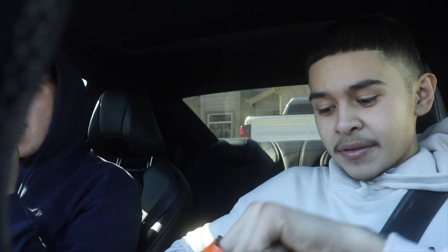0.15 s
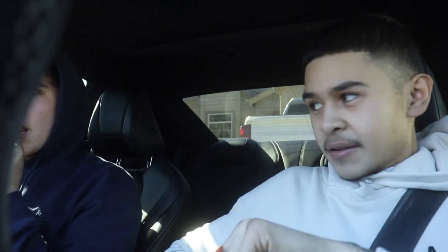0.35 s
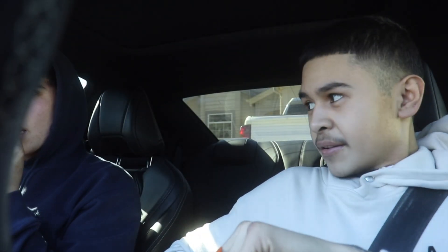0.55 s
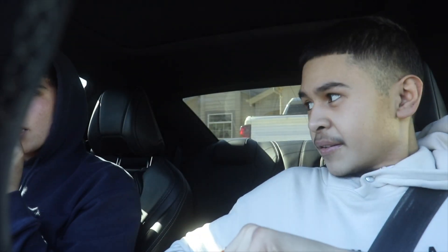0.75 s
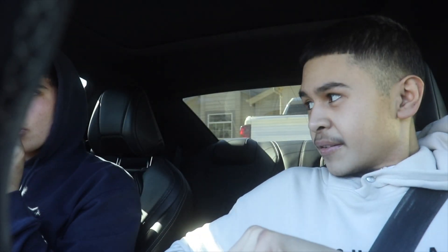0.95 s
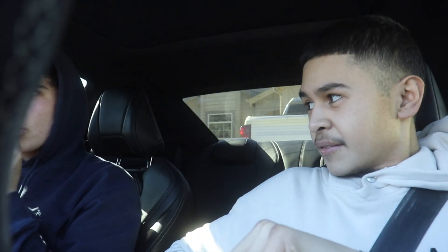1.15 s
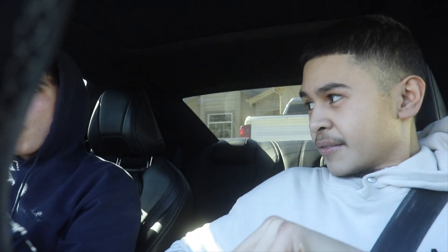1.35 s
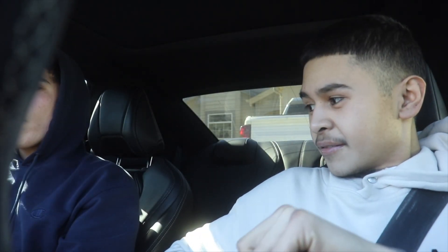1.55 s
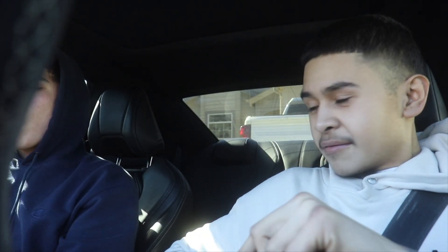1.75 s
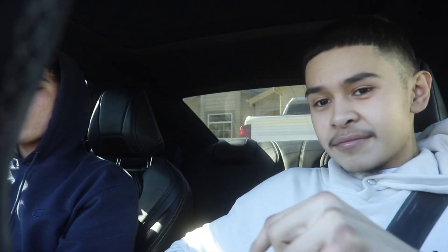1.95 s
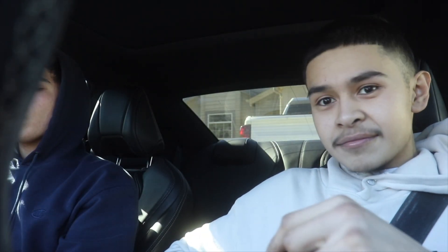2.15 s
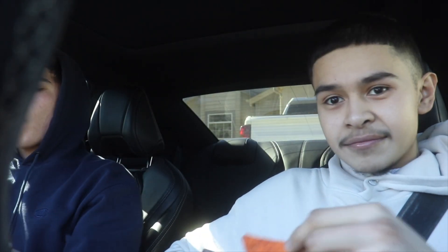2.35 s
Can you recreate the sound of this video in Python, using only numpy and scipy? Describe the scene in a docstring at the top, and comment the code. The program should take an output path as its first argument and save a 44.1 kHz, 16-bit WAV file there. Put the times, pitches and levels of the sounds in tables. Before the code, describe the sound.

A snack bag crinkles in short, irregular bursts as a hand digs inside. Sharp foil snaps mix with soft bumps on the bag, and chips click twice in small clusters, close by in a quiet parked car.

```python
"""Snack bag in a parked car

Hands dig in a foil bag: creases snap in short bursts over a fine rustle, film slides on film,
chips click and ring as they are pulled out, and the hand bumps the bag softly.
The small padded cabin answers briefly over a low rumble; the loudest snaps overload the microphone."""
import sys
import numpy as np
from scipy import signal
from scipy.fft import rfft, irfft, next_fast_len
from scipy.io import wavfile
from scipy.ndimage import uniform_filter1d, map_coordinates

SR = 44100
rng = np.random.default_rng(int(sys.argv[2]) if len(sys.argv) > 2 else 0)


def dump_mix(stems):
    """Bounce the given channels to the path in sys.argv[1] as a 16-bit WAV at rate SR."""
    frames = np.atleast_2d(stems).T  # one column per channel
    limited = np.clip(frames, -1, 1)  # hard clip at full scale
    pcm = np.round(limited * 32767).astype(np.int16)
    wavfile.write(sys.argv[1], SR, pcm)


N = 105840
SIZE = 4096  # samples per short event
T, HZ = np.arange(SIZE) / SR, np.fft.rfftfreq(SIZE, 1 / SR)
FLUTTER_T60_S = 0.02  # film shaking after a snap


def amp(db):
    """dB to gain."""
    return 10 ** (np.asarray(db) / 20)


def unit(x):
    """Scale to rms 1."""
    return x / np.sqrt(np.mean(x ** 2) + 1e-20)


def norm(x):
    """Scale to energy 1."""
    return x / np.sqrt(np.sum(x ** 2) + 1e-20)


def add(out, start_s, x):
    """Mix x into out at start_s."""
    part = out[max(round(start_s * SR), 0):][:len(x)]
    part += x[:len(part)]


def shape(points, hz=HZ):
    """Gain through (frequency [Hz], level [dB]) points, log axis."""
    point_hz, db = np.transpose(points)
    return amp(np.interp(np.log(hz + 1), np.log(point_hz + 1), db))


def hump(hz, width_oct):
    """Resonance, bell-shaped on a log axis."""
    return np.exp(-.5 * (np.log2((HZ + 1) / hz) / width_oct) ** 2)


def filtered(x, response):
    """Apply a frequency response to x."""
    size = next_fast_len(N + SIZE)
    return irfft(rfft(x, size) * response(np.fft.rfftfreq(size, 1 / SR)), size)[:N]


def coloured(x, points):
    """x shaped by a spectrum, rms 1."""
    return unit(filtered(x, lambda hz: shape(points, hz)))


def even(x):
    """Level a burst's broad colour, keep its timing and fine grain; energy 1."""
    spectrum = rfft(x)
    smooth_power = np.abs(uniform_filter1d(np.abs(spectrum) ** 2, size=41))
    return norm(irfft(spectrum / np.sqrt(smooth_power + 1e-20)))


def click(gain):
    """Minimum-phase pulse with this spectrum, energy 1."""
    cepstrum = irfft(np.log(np.maximum(unit(gain), 1e-4)))
    cepstrum[1:SIZE // 2] *= 2
    cepstrum[SIZE // 2 + 1:] = 0
    return norm(irfft(np.exp(rfft(cepstrum))))


def fade(t60_s):
    """Exponential decay."""
    return np.exp(-np.log(1000) * T / t60_s)


def tone(hz, t60_s):
    """Short, slightly rough ring, energy 1."""
    jitter_rad = 0.074 * np.cumsum(rng.standard_normal(SIZE))
    return norm(np.sin(2 * np.pi * hz * T + jitter_rad) * fade(t60_s))


def cabin():
    """Low rumble and faint hiss in the closed car."""
    # still cabin (frequency [Hz], level [dB])
    spectrum = [(20, -11.5), (45, -1), (90, -4.5), (170, -1.5), (280, -11), (550, -19), (1500, -23),
                (5000, -28), (10000, -35.5), (16000, -36)]
    return amp(-47) * coloured(rng.standard_normal(N), spectrum)


def pressure(start_s, end_s, edge_s):
    """A stroke builds up, holds and lets go."""
    t = np.arange(N) / SR
    outside_s = np.maximum(start_s - t, 0) + np.maximum(t - end_s, 0)
    return np.exp(-outside_s / edge_s)


def crackle(grains_per_s=830, spread_db=3):
    """Tiny creases of random size, each with a short flutter, on a smooth hiss."""
    sizes = amp(spread_db * np.minimum(rng.exponential(size=N), 3)) * rng.choice([-1, 1], N)
    grains = sizes * (rng.random(N) < grains_per_s / SR)
    flutter_power = np.abs(signal.fftconvolve(grains ** 2, fade(FLUTTER_T60_S) ** 2)[:N])
    flutter = np.sqrt(flutter_power) * rng.standard_normal(N)
    return unit(grains) + unit(flutter) + 0.8 * rng.standard_normal(N)


def patchy(x, limit_db=8):
    """Resonances come and go as the bag changes shape."""
    frames = signal.stft(x, nperseg=512)[2]
    field = uniform_filter1d(rng.standard_normal(frames.shape), size=5, axis=0)
    field = uniform_filter1d(field, size=7, axis=1)
    gain = amp(limit_db * np.tanh(unit(field) / 2))
    return unit(signal.istft(frames * gain, nperseg=512)[1][:N])


def rustle(uneven_db=1.5, uneven_per_s=55):
    """Countless tiny creases crackle while the hand rubs the film unevenly."""
    # hand strokes (start [s], end [s], crinkle [dB], rub [dB])
    strokes = [(0, 0.141, -49, -45), (0.212, 0.312, -35, -43.5), (0.38, 0.453, -37.5, -44.5),
               (0.532, 0.555, -43, -40.5), (0.59, 0.659, -43.5, -47.5), (0.839, 0.975, -37.5, -43),
               (1.035, 1.245, -33.5, -41), (1.324, 1.443, -36.5, -42.5), (1.444, 1.475, -30, -35),
               (1.491, 1.496, -25, -31), (1.552, 1.653, -32, -39), (1.717, 1.843, -35, -45.5),
               (1.872, 2.008, -38, -44), (2.071, 2.167, -37.5, -37.5), (2.369, 2.404, -46.5, -45)]
    # spectra of creases and rubbing (frequency [Hz], level [dB])
    crinkle_spectrum = [(410, -72), (700, -11), (958, -7), (1350, -2), (1680, -5.5), (5470, -7.5),
                        (5920, -14), (12200, -23), (16000, -34)]
    rub_spectrum = [(60, -4.5), (150, -6.5), (300, 6.5), (480, 0), (700, -4), (1500, -36)]
    start_s, end_s, crinkle_db, rub_db = np.transpose(strokes)[..., None]
    pressing = pressure(start_s, end_s, edge_s=0.024)
    wander = map_coordinates(rng.standard_normal(SIZE), [np.arange(N) / SR * uneven_per_s])
    crinkle_gain = np.max(amp(crinkle_db - 1.5) * pressing, axis=0)
    rub_gain = np.max(amp(rub_db - 2) * pressing, axis=0)
    crinkle = patchy(coloured(crackle(), crinkle_spectrum))
    rub = coloured(rng.standard_normal(N), rub_spectrum)
    return amp(uneven_db * wander) * (crinkle_gain * crinkle + rub_gain * rub)


def bumps():
    """Dull pushes on the air-filled bag, which rings briefly."""
    # hand on bag (time [s], level [dB], pitch [Hz])
    pushes = [(0.14, -22, 229), (0.398, -23, 190), (.539, -22.5, 172), (0.683, -26.5, 239),
              (.811, -23.5, 512), (1.145, -24, 474), (1.204, -28, 316), (1.256, -24, 315),
              (1.492, -27, 286), (1.622, -22.5, 332), (2.065, -18, 227), (2.1, -16, 214),
              (2.101, -20.5, 460)]
    out = np.zeros(N)
    for time_s, db, hz in pushes:
        push = click(hump(hz, width_oct=0.53) + 0.0011)
        boom = norm(signal.fftconvolve(push, tone(hz, t60_s=0.059))[:SIZE])
        add(out, time_s, amp(db + 17) * norm(push + 0.53 * boom))
    return out


def slides():
    """Film slipping over film crackles in one resonance."""
    # runs of tiny cracks (start [s], end [s], level [dB], centre [Hz])
    runs = [(0.208, 0.246, -45, 11000), (0.3, 0.4, -39, 4700), (0.858, 0.917, -46, 5300),
            (1.03, 1.054, -30.5, 7550), (1.923, 2.007, -44, 5630), (1.99, 2.012, -30, 9200),
            (2.002, 2.016, -34, 13100), (2.068, 2.183, -43, 2720)]
    out = np.zeros(N)
    for start_s, end_s, db, hz in runs:
        resonance = click(hump(hz, width_oct=0.22) + 0.055)
        crunch = signal.fftconvolve(crackle(), resonance)[:N]
        out += amp(db) * pressure(start_s, end_s, edge_s=0.0073) * patchy(crunch)
    return out


def scatter(t60_s, rise_s):
    """Dying cloud of small echoes, energy 1."""
    onset = 1 - np.exp(-(T / rise_s) ** 2)
    return norm(rng.standard_normal(SIZE) * fade(t60_s) * onset)


def shaken(pulse, give_s, db):
    """A pulse broken into quick steps and spread by the film, then film flutter and cabin echo."""
    steps = rng.standard_normal(SIZE) * fade(give_s) * T
    delay_1khz_s = 0.000637  # higher bending waves travel faster
    spread = irfft(rfft(pulse) * np.exp(-4j * np.pi * delay_1khz_s * np.sqrt(1000 * HZ)))
    crumple_db = -0.25 * db  # strong snaps flip cleanly, weak ones leave more shaking
    flutter = amp(crumple_db - 8) * scatter(FLUTTER_T60_S, rise_s=0.001)
    echo = amp(crumple_db / 2 - 11) * scatter(t60_s=0.06, rise_s=0.0019)
    burst = even(irfft(rfft(steps) * (1 + rfft(flutter + echo))))
    return norm(signal.fftconvolve(spread, burst[:SIZE // 2])[:SIZE])


def snaps(lag_s=0.0007):
    """A crease flips: a pulse at its facet's pitch, with a sharp edge and a puff of the bag's air."""
    # flips (time [s], level [dB], pitch [Hz], hollow body [dB], sharp edge [dB], give-way time [s])
    creases = [(0.2188, -8.5, 4530, -25, -16.5, 0.01), (0.2358, -9.5, 2620, -23.5, -12, 0.006),
               (0.2467, -12, 5640, -30, -13, 0.0022), (0.2642, 3.5, 4860, -28.5, -25, 0.0026),
               (0.282, -14, 2350, -22, -17, 0.0031), (0.41, -13, 4470, -21.5, -19, .004),
               (0.4281, -16, 3430, -32, -39, 0.0016), (0.4403, -5.5, 3600, -44, -10.5, 0.0023),
               (0.4517, -10, 1320, -32, -50, 0.0021), (0.4701, -11, 3640, -21.5, -21, 0.0022),
               (0.4731, -22, 3460, -36, -4, 0.0023), (0.4962, 3, 4860, -50, -20, 0.0011),
               (0.5363, -13.5, 1930, -14, -28, 0.0093), (0.644, -20, 3300, -15.5, -39, 0.0056),
               (0.683, -11.5, 4900, -25.5, -12.5, 0.0021), (0.8076, -18, 1470, -6.5, -69, 0.00068),
               (1.0615, -10.5, 1290, -19, -17, 0.0052), (1.0788, -7, 4350, -20.5, -16, 0.0031),
               (1.0929, -6.5, 3050, -24.5, -12, 0.0014), (1.1052, -14, 1380, -16, -25, .003),
               (1.1144, -12.5, 3700, -23, -39, 0.0028), (1.141, -9.5, 1440, -31, -18, 0.013),
               (1.3813, -13.5, 2100, -17.5, -20, .002), (1.4015, 0.5, 4500, -22.5, -17.5, 0.0036),
               (1.4026, -7, 1320, -22.5, -26, 0.0023), (1.463, -15, 1850, -17.5, -39, 0.0069),
               (1.5001, -8.5, 1350, -41, -24, 0.01), (1.5998, -8.5, 2240, -18.5, -28, 0.0012),
               (1.6673, -20, 5950, -36, -3.5, 0.0043), (1.7396, -5, 3000, -24.5, -26, 0.0045),
               (1.8111, -9, 4200, -20, -22, 0.0024), (1.815, -1, 3200, -31, -19, 0.0029),
               (1.897, -19.5, 2160, -14, -14, 0.0096), (2.099, -12.5, 2970, -27, -32, 0.0025)]
    # spectra of film, air in the bag and sharp edge (frequency [Hz], level [dB])
    film_spectrum = [(200, -25), (850, -21), (1100, 2), (1400, 5), (1850, -0.5), (2300, 11.5), (2800, 5.5),
                     (3400, 6.5), (5200, 8), (6500, 4.5), (9000, -60)]
    body_spectrum = [(60, -10), (200, -22.5), (350, 3), (800, -7.5), (1250, 1), (1900, -2), (4000, -41)]
    edge_spectrum = [(2000, 6), (5000, -7.5), (8000, 10), (11000, 3), (16000, -1)]
    out = np.zeros(N)
    for time_s, db, hz, body_db, edge_db, give_s in creases:
        facet = hump(hz, width_oct=0.64) + 1.3 * hump(hz, width_oct=0.086) + 0.4
        film = unit(shape(film_spectrum) * facet)
        body = amp(body_db + 13.5) * unit(shape(body_spectrum))
        edge = amp(edge_db + 8) * unit(shape(edge_spectrum))
        spectrum = np.linalg.norm([film, body, edge], axis=0)
        gain = amp(db + 10) * np.sqrt(np.mean(spectrum ** 2))
        add(out, time_s + lag_s, gain * shaken(click(spectrum), give_s, db))
    return out


def chips():
    """A chip clicks: a bright crack, a short ring and a lower hollow note."""
    # (time [s], level [dB], crack cutoff [Hz], ring [Hz], ring [dB], hollow [Hz], hollow [dB])
    chip_clicks = [(.847, -18, 4300, 5550, -1.5, 1004, 3), (0.8784, -9, 4470, 5380, -1.5, 900, -11.5),
                   (0.9211, -20, 7160, 5280, -3, 950, -33), (.938, 0.5, 6470, 5254, 0, 960, -19),
                   (0.9432, -6, 4000, 5210, 3, 910, -10.5), (.9526, -25, 4600, 5350, -2, 870, -23),
                   (0.961, -2.5, 4800, 5400, -7.5, 845, -16), (1.0212, -12, 4050, 4760, -15, 910, -26),
                   (1.0306, -2.5, 4050, 6380, -11, 910, -26), (1.0376, -11, 4220, 4150, -15, 890, -9),
                   (1.0433, 0, 3850, 7320, -7, 795, -21), (1.922, -17.5, 6900, 5470, -0.5, 1180, -7),
                   (1.971, -17, 7300, 3300, -24, 1200, -26), (1.977, -14, 7400, 3160, -25, 1200, -23),
                   (1.982, -1.5, 7260, 3390, -15, 1240, -41), (1.9862, -10, 7200, 3160, -31, 1277, -9.5),
                   (1.999, -16, 7540, 3370, -15, 1190, 0.5), (2.0048, -10, 5340, 3340, -0.5, 930, -15.5),
                   (2.029, -16.5, 6900, 3340, 0, 900, -10), (2.0476, -9.5, 7150, 5190, -7.5, 660, -6.5)]
    # crack (frequency [Hz], level [dB])
    crack_spectrum = [(100, -28), (400, 8), (4000, 10.5), (8500, 0), (13500, -7.5), (16000, -12)]
    # chip resonances (ratio to ring pitch, level [dB])
    modes = [(1, 0), (1.451, -8), (1.63, -16), (2.6, -20)]
    out = np.zeros(N)
    for time_s, db, low_hz, ring_hz, ring_db, hollow_hz, hollow_db in chip_clicks:
        highpass = 1 / (1 + (low_hz / (HZ + 1)) ** 8)
        peak = 1.23 * hump(1.146 * low_hz, width_oct=0.052)
        pulse = click(shape(crack_spectrum) * (highpass + peak + 0.057))
        crack = shaken(pulse, give_s=0.0027, db=db)
        ring = sum(amp(mode_db) * tone(ratio * ring_hz, t60_s=0.051) for ratio, mode_db in modes)
        knock = click(hump(hollow_hz, width_oct=0.36) + 0.0042)
        hollow = knock + norm(signal.fftconvolve(knock, tone(hollow_hz, t60_s=0.042))[:SIZE])
        chip = crack + amp(ring_db) * norm(ring) + amp(hollow_db) * norm(hollow)
        add(out, time_s, amp(db + 9.5) * chip)
    return out


def scene():
    """All sources at one microphone."""
    return (snaps() + chips() + bumps() + rustle() + slides() + cabin())[None]


def record(dry):
    """Microphone overload rounds the loudest peaks; a band limit follows."""
    ceiling, top_hz = 1.05, 16100
    rounded = dry[0] / (1 + (dry[0] / ceiling) ** 4) ** .25
    return filtered(rounded, lambda hz: hz < top_hz)[None]


dry = scene()
out = record(dry)
dump_mix(out)
```